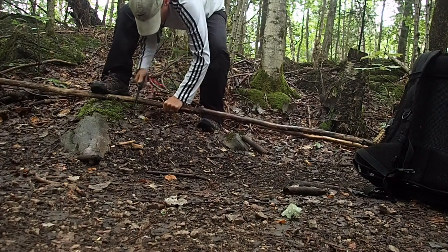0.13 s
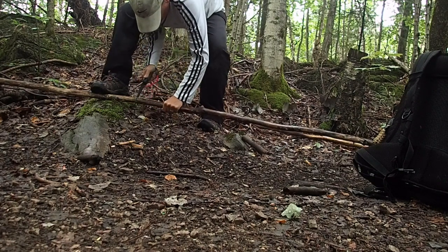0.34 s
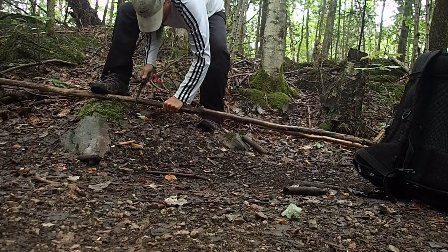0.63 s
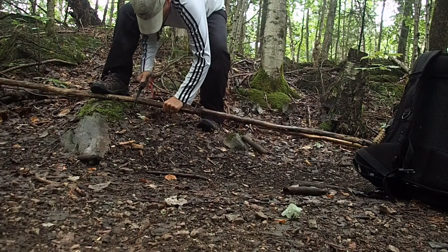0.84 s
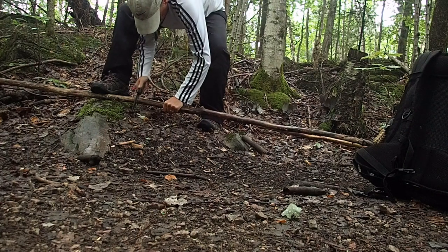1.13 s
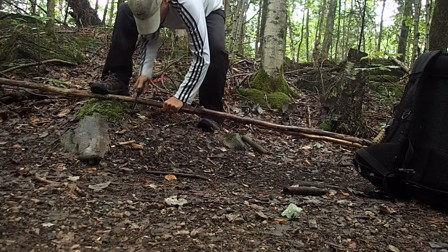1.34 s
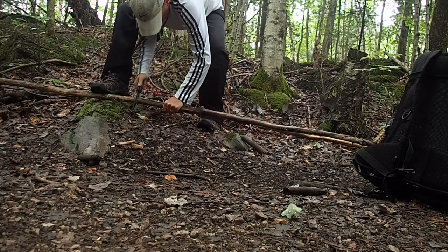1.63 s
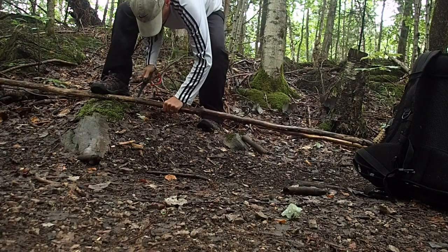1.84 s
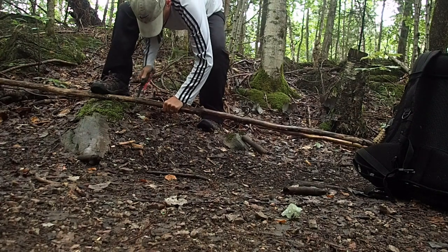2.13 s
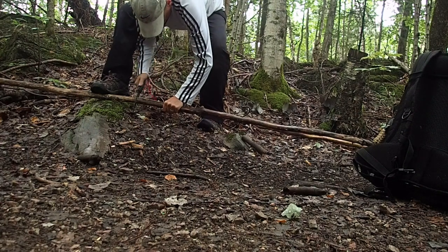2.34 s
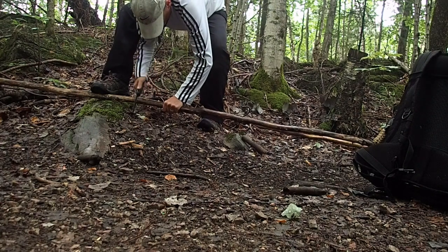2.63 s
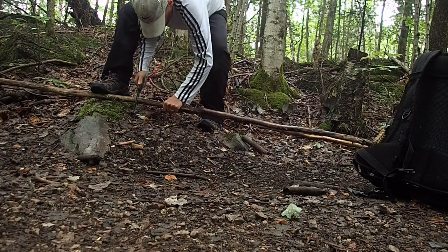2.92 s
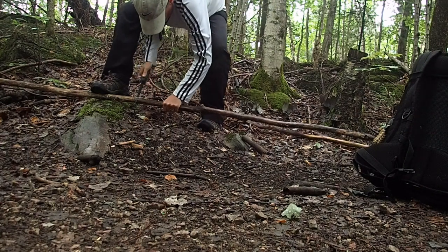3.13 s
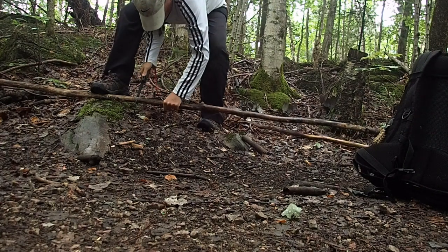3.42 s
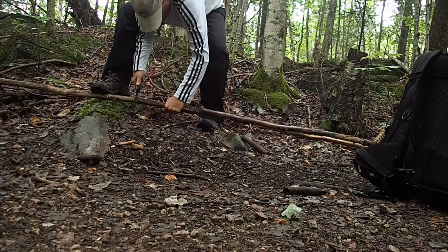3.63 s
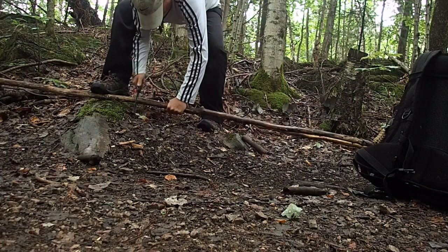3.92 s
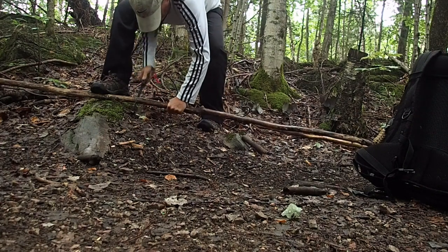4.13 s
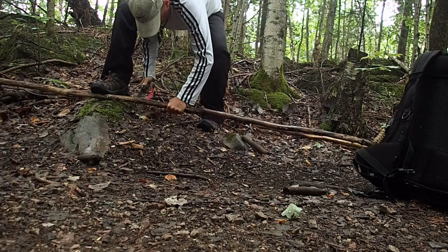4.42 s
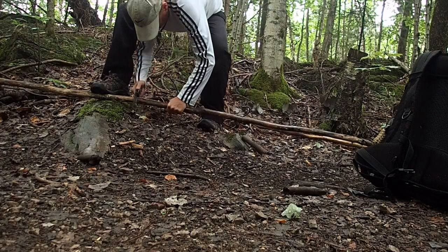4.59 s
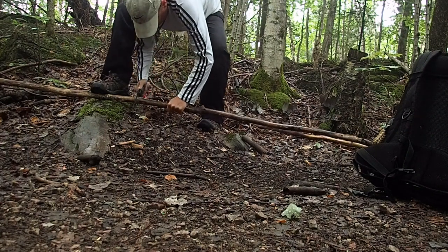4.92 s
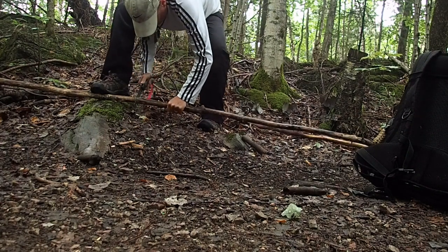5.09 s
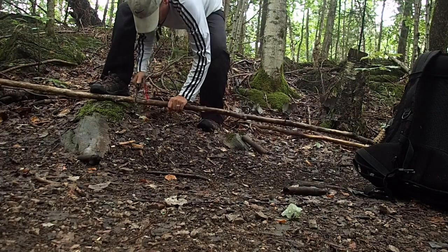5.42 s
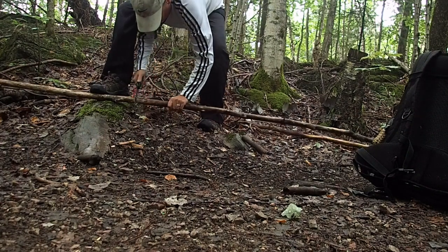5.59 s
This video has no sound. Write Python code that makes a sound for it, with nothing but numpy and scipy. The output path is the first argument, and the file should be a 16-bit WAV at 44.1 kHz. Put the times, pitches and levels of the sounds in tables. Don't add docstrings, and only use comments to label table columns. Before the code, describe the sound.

In a quiet forest, a small hand saw cuts a thin branch in quick short strokes, each a dry toothy rasp with a hollow wooden knock. After a brief pause the strokes resume rougher, with sharp snags and snapping fibres, until the branch parts with a crack. Soft bumps follow. The stereo microphone is a few metres away, the saw slightly to the right, with faint tree echo and leafy hiss.

```python
import sys
import numpy as np
from scipy import signal
from scipy.fft import rfft, irfft, next_fast_len
from scipy.io import wavfile
from scipy.ndimage import uniform_filter1d, map_coordinates

SR = 44100
rng = np.random.default_rng(int(sys.argv[2]) if len(sys.argv) > 2 else 0)


def wav_record(signal):
    frames = np.transpose(np.atleast_2d(signal))
    bounded = np.clip(frames, -1, 1)
    quanta = np.round(bounded * 32767).astype(np.int16)
    wavfile.write(sys.argv[1], SR, quanta)


def nominal_scale(level):
    x = np.asarray(level, float) / 20
    return 10 ** x


N = 253560


def unit(x):
    return x / np.sqrt(np.mean(x ** 2) + 1e-20)


def along(points, hz):
    f, v = np.transpose(points)
    return np.interp(np.log(hz + 1), np.log(f + 1), v)


def wobble(rate):
    return map_coordinates(rng.standard_normal(int(N * rate / SR) + 4), [np.arange(N) * rate / SR])


def filtered(x, response):
    m = next_fast_len(N + SR // 2)
    return irfft(rfft(x, m) * response(np.fft.rfftfreq(m, 1 / SR)), m)[..., :N]


def resonances(modes):
    def shape(f):
        return sum(nominal_scale(db) * 1j * f * width / (centre * centre - f * f + 1j * f * width)
                   for centre, width, db in modes)
    size = np.sqrt(np.mean(abs(shape(np.linspace(0, SR / 2, 2048))) ** 2))
    return lambda f: shape(f) / size


def noise_pair(alike):
    def mix(hz):
        turn = np.arccos(np.clip(along(alike, hz), 0, 1)) / 2
        return np.array([np.cos(turn), np.sin(turn)])
    mid, side = filtered(rng.standard_normal((2, N)), mix)
    return np.array([mid + side, mid - side])


def patchy(x, depth_db):
    z = signal.stft(x, nperseg=128)[2]
    field = uniform_filter1d(rng.standard_normal(z.shape[-2:]), size=4, axis=0)
    field = uniform_filter1d(field, size=5, axis=1)
    return signal.istft(z * nominal_scale(depth_db * unit(field)), nperseg=128)[1][..., :N]


# f/Hz, level/dB per Hz
AIR = [(20, -52), (50, -11.5), (160, -8), (300, -7.5), (480, -13.5), (700, -9.5), (1000, -12),
       (1500, -13.5), (3000, -22.5), (4100, -24), (5200, -13), (8200, -16.5), (10000, -22), (16000, -23)]
# f/Hz, likeness/0-1
AIR_ALIKE = [(60, 0.33), (240, 0.072), (950, 0.26), (3770, 0.52), (15000, 0.037)]
# t/s, level/dB
AIR_DB = [(0, -45.5), (.08, -50.5), (3.199, -50), (3.5, -51), (5.75, -51)]


def air():
    s, db = np.transpose(AIR_DB)
    hiss = unit(filtered(noise_pair(AIR_ALIKE), lambda hz: nominal_scale(along(AIR, hz))))
    level_db = np.interp(np.arange(N) / SR, s, db) + 0.81 * wobble(3.3)
    return hiss * nominal_scale(level_db + np.array([[-1], [2.2]]))


# start t/s, length/s, share before top speed/0-1, rasp
# level/dB, pressure on the wood/dB relative
SAW_STROKES = [(.118, 0.067, 0.28, -42.5, -1), (0.153, 0.11, 0.41, -49, -7), (0.256, .12, 0.61, -39, 3.5),
               (0.387, .14, .62, -34.5, -1), (0.529, .15, 0.68, -37, 2), (0.708, 0.093, 0.64, -37, -2.5),
               (.873, .1, 0.65, -35.5, 0.5), (0.997, .11, 0.69, -36.5, 0.5), (1.07, 0.097, 0.7, -44, 0.5),
               (1.167, 0.066, 0.25, -41, 5), (1.186, .11, 0.675, -40, 3), (1.303, .11, 0.862, -34.5, -1),
               (1.428, .14, 0.76, -35.5, 0), (1.603, .12, 0.52, -36, 0), (1.758, .12, 0.63, -37.5, 2),
               (1.922, .11, .42, -36.5, 0), (2.033, .18, 0.79, -36.5, 1.5), (2.251, 0.097, 0.69, -34.5, -0.5),
               (2.399, .11, .73, -39, 4.5), (2.567, 0.12, 0.49, -35, -2), (2.695, .16, 0.8, -36.5, 0.5),
               (2.91, .11, 0.36, -37.5, -1.5), (3.045, 0.12, 0.72, -38, 0),
               (3.56, .125, 0.553, -36.5, -1), (3.683, .18, 0.59, -34, -3.5), (3.873, 0.11, 0.84, -36, -4),
             (3.986, 0.15, 0.82, -36, 0), (4.148, 0.13, 0.71, -35, -1.5), (4.325, .11, 0.81, -39, 0.5),
             (4.558, 0.071, 0.48, -40, -3.5), (4.611, 0.045, 0.61, -43, 3), (4.715, 0.11, 0.523, -33, -1),
             (4.839, .096, 0.74, -43.5, 1), (4.903, 0.16, 0.061, -50, -25), (5.009, .098, 0.713, -37, 2)]
# t/s, bending over wood level/dB
GIVE = [(.1, -3.5), (.6, -3), (1.0, -1.5), (1.3, -3.5), (2.1, -0.5), (2.35, -1), (2.8, 2), (3.15, -2),
        (3.9, 1), (4.7, 1), (5.1, -2)]


def strokes():
    t, force, speed = np.arange(N) / SR, np.zeros((3, N)), np.zeros(N)
    steepness = np.array([[1.2], [1.6], [2.4]])
    short_bends_db_per_s, usual_stroke_s = -42, 0.089
    for start, length, top, rasp_db, press_db in SAW_STROKES:
        u = np.clip((t - start) / length, 0, 1)
        top = np.clip(top, .05, .95)
        speeding = np.sin(np.pi / 2 * u / top)
        slowing = abs(np.sin(np.pi / 2 * (1 - u) / (1 - top))) ** .67
        arc = np.where(u < top, speeding, slowing)
        give_db = np.interp(start, *np.transpose(GIVE))
        give_db += short_bends_db_per_s * (length - usual_stroke_s)
        levels_db = rasp_db + np.array([0, press_db, press_db + give_db])
        force += nominal_scale(levels_db)[:, None] * arc ** steepness
        speed = np.maximum(speed, arc)
    return force, speed


# f/Hz, likeness/0-1
ALIKE = [(2000, 0.73), (5400, 1), (8000, 0.9), (10000, 0.1), (15000, 0.58)]


def sawing(scatter=.12, size_db=3.0, bite_s=0.0017, steady=1.6, fuzz=0.89, soft_hz=1500, hum=0.04):
    force, speed = strokes()
    turn_hz, fast_hz = 260.9, 317.6
    rate = (turn_hz + (fast_hz - turn_hz) * speed) * (1 + .1 * wobble(12))
    passed = np.cumsum(rate * (1 + .04 * wobble(30))) / SR
    chance = rng.standard_normal((4000, 3))
    tooth = np.arange(1, passed[-1] - 1)
    count = len(tooth)
    at = np.interp(tooth + scatter * chance[:count, 0], passed, np.arange(N)).astype(int)
    bites = np.bincount(at, nominal_scale(size_db * chance[:count, 1]), N)
    rips = np.bincount(at, nominal_scale(size_db * chance[:count, 2]), N)
    tearing = unit(signal.lfilter([1], [1, -np.exp(-1 / (bite_s * SR))], rips))
    rasp = unit((steady + tearing) * patchy(noise_pair(ALIKE), depth_db=2.0))
    rasp = rasp * force[0] * nominal_scale(1.02 * wobble(40))
    push = unit(bites - bites.mean()) + fuzz * rng.standard_normal(N)
    push = filtered(push, lambda hz: 1 / (1 + 1j * hz / soft_hz) ** 2)
    push = push * nominal_scale(0.77 * wobble(35))
    sway = 0.99 * push + hum * np.cos(2 * np.pi * passed)
    return rasp, push * force[1], sway * force[2]


# f/Hz, width/Hz, level/dB
RASP = [(2042, 190, 1), (3190, 500, -4), (3666, 157, -9), (4600, 170, -1), (5180, 300, -4), (5840, 610, 0),
        (6420, 1120, 2.5), (7480, 570, 3.5), (8000, 200, 1), (10500, 350, -45), (12800, 5500, -14.5),
        (15700, 3200, -14)]
# f/Hz, width/Hz, level/dB
WOOD = [(586.6, 56, 1), (713, 125, 8), (799, 45, 1.5), (915, 180, 7), (1117, 90, -4), (1240, 53, -5.5),
        (1616, 53, 7)]
# f/Hz, width/Hz, level/dB
BENDING = [(263.7, 63, 10), (361.3, 77, 7)]


def branch():
    rasp, push, bend = sawing()
    snag, snag_knock = snagging()
    snap, snap_knock = snapping()
    fibres = filtered(nominal_scale(-0.5) * rasp, resonances(RASP)) + snag + snap
    knocks = nominal_scale(1.0) * patchy(push, depth_db=1.5) + snag_knock + snap_knock
    wood = filtered(knocks, resonances(WOOD))
    low = filtered(bend + landing(), resonances(BENDING)) + shudders()
    return lean(fibres + wood + ticks() + bumps()) + low * nominal_scale(np.array([[-16], [1.5]]))


# f/Hz, left minus right level/dB
LEFT = [(300, 4), (700, -3.5), (2400, -3), (5500, -5.5), (8500, -5.5), (11000, -2.5), (15000, 0)]


def lean(x):
    early_s = 6e-6 * np.array([[-1], [1]])
    return filtered(x, lambda hz: nominal_scale(along(LEFT, hz) * [[.5], [-.5]]) * np.exp(2j * np.pi * hz * early_s))


# f/Hz, t60/s
TRUNKS = [(300, 0.28), (1500, 0.21), (3000, 0.69), (5500, 0.7), (8500, 0.33), (13000, 0.32)]


def trunks(x, gap_s=.005, count=8):
    out, step, gap = np.zeros((2, N + SR)), N // count + 1, round(gap_s * SR)
    for start in range(0, N, step):
        hz, t, z = signal.stft(rng.standard_normal((2, SR * 3 // 4)), SR, nperseg=256)
        decay = nominal_scale(-60 * t / along(TRUNKS, hz)[:, None])
        build = 1 - 0.4 * np.exp(-t / 0.0074)
        tail = signal.istft(z * decay * build, SR, nperseg=256)[1]
        tail[1] = .5 * tail[0] + 0.75 * tail[1]
        echo = signal.fftconvolve(x[:, start:start + step], tail / np.linalg.norm(tail[0]), axes=1)
        out[:, start + gap:][:, :echo.shape[1]] += echo
    return out[:, :N]


def tears(events, rasp_db, knock_db, rise_s, alike):
    size, knock, t = np.zeros(N + SR), np.zeros(N + SR), np.arange(SR // 10) / SR
    for s, db, wood_db, t60 in events:
        burst = nominal_scale(db - 60 * t / max(t60, .002)) * (1 - np.exp(-t / rise_s))
        size[round(s * SR):][:len(t)] += burst
        knock[round(s * SR):][:len(t)] += nominal_scale(wood_db) * burst
    torn = nominal_scale(rasp_db) * size[:N] * noise_pair(alike)
    return torn, nominal_scale(knock_db) * knock[:N] * rng.standard_normal(N)


# t/s, peak level/dB
CATCHES = [(0.133, -27.5), (0.1828, -28.5), (1.0295, -30), (1.6232, -34), (1.6866, -23), (1.937, -28),
           (2.0685, -36), (2.0868, -26), (2.1445, -32), (2.582, -35), (2.7262, -41), (2.7354, -27.5),
           (3.064, -35), (3.285, -47), (3.505, -52), (3.5635, -35), (3.64, -25), (3.648, -23),
           (3.9385, -23), (4.2963, -29), (4.569, -42), (4.59, -26), (4.633, -25), (4.9576, -29),
           (5.171, -35), (5.176, -40)]
# t/s, peak level/dB, wood knock/dB relative
SNAGS = [(0.32, -22, -13), (0.574, -19, -12), (0.9154, -27, -11), (1.117, -26.5, 3), (1.127, -31.5, 11),
         (1.1765, -20.5, -3), (1.186, -18, -20), (1.1933, -16, -32), (1.2082, -21, -19), (1.2373, -25, 4),
         (1.3973, -16, -26), (1.9528, -23.5, -6), (0.557, -37, 12), (3.5995, -41.5, 23.5),
         (3.631, -12.5, -16), (3.6945, -24, -5.5), (3.732, -15.5, -14), (3.7513, -12, -22),
         (3.7672, -13.5, -24), (3.7786, -21, -24), (3.9505, -24.5, -3), (4.2639, -16, -11),
         (4.6277, -19, -4), (4.6394, -16.5, -2.5), (4.7121, -35.5, 8.5), (4.7345, -26.5, -4),
         (4.7602, -12, -18), (4.7676, -16, -8), (4.784, -19, -3), (4.79, -14, -18)]
# t/s, peak level/dB, knock/dB relative, t60/s
SLAP = (5.22, -32, -5, 0.2)
# f/Hz, width/Hz, level/dB
BLADE = [(3460, 1800, -5.5), (4700, 770, -7), (6270, 1150, 5.5), (7770, 1100, 5), (13000, 6500, -17)]


def snagging():
    snag_t60_s, catch_t60_s, catch_knock_db = 0.018, 0.021, -17.5
    caught = [(*row, snag_t60_s) for row in SNAGS]
    caught += [(*row, catch_knock_db, catch_t60_s) for row in CATCHES]
    caught += [SLAP]
    snag, knock = tears(caught, rasp_db=-4, knock_db=-6.5, rise_s=0.00051, alike=ALIKE)
    blade = resonances(BLADE)
    return nominal_scale(-5.5) * filtered(filtered(snag, blade), blade), knock


# t/s, peak level/dB
TICKS = [(.218, -43), (.234, -39), (2.398, -47)]
# f/Hz, level/dB, t60/s
STEEL = [(4530, 2.5, 0.02), (9000, -8, .03), (11200, -2, 0.043), (15000, -8, .05)]


def ticks():
    out, t = np.zeros(N + SR), np.arange(SR // 5) / SR
    for s, db in TICKS:
        for hz, level, t60 in STEEL:
            out[round(s * SR):][:len(t)] += nominal_scale(db + level - 60 * t / t60) * np.sin(2 * np.pi * hz * t)
    return out[:N]


# t/s, peak level/dB, wood knock/dB relative, tearing t60/s
SNAPS = [(.850, -32, -30, .009), (3.9928, -24.5, -14, 0.0078), (4.2644, -36, -26, 0.0075),
         (4.5009, -30, -24, 0.014), (4.5151, -23.5, -15, 0.0092), (4.927, -10, -18, 0.0081),
         (5.7414, -36, -4, 0.0086)]
# f/Hz, width/Hz, level/dB
DRY = [(1220, 860, -13), (2110, 270, -10), (3100, 300, -8.5), (4460, 430, -4), (5130, 320, 5),
       (5900, 240, -10), (7063, 430, -5), (8020, 560, 4), (10174, 800, -23), (12410, 1100, -20),
       (15110, 1500, -18.5)]


def snapping():
    alike = [(5000, 0.87), (14000, 0.47)]
    snap, knock = tears(SNAPS, rasp_db=-1.0, knock_db=3.0, rise_s=0.00022, alike=alike)
    return filtered(snap, resonances(DRY)), knock


# start t/s, length/s, f/Hz, level/dB
SHUDDERS = [(2.284, .08, 249.9, -33), (2.441, 0.072, 285.5, -32), (2.604, .045, 250.3, -29.5),
            (2.626, 0.05, 343, -26), (2.775, .07, 300, -30)]


def shudders():
    t, out = np.arange(N) / SR, np.zeros(N)
    for s, length, hz, db in SHUDDERS:
        swell = np.sin(np.pi * np.clip((t - s) / length, 0, 1)) ** 2
        out += nominal_scale(db) * swell * np.sin(2 * np.pi * hz * t)
    return out


# t/s, peak level/dB, f/Hz, t60/s, rise/s
BUMPS = [(3.636, -23, 1283, 0.038, .001), (3.951, -26, 1257, 0.054, .001),
         (4.264, -25, 1256, 0.024, 0.00085), (5.660, -27, 419, 0.05, 0.0077),
         (5.727, -28, 1110, 0.021, 0.0007), (5.73, -32, 334, 0.04, 0.0054)]


def bumps():
    out, t = np.zeros(N + SR), np.arange(SR // 5) / SR
    for s, db, hz, t60, rise in BUMPS:
        sag = 2 * np.pi * hz * t * (1 - 4 * t)
        tone = np.sin(sag) + 0.18 * np.sin(2.7 * sag) * np.cos(0.38 * sag)
        out[round(s * SR):][:len(t)] += nominal_scale(db - 60 * t / t60) * (1 - np.exp(-(t / rise) ** 2)) * tone
    return out[:N]


# t/s, peak level/dB
BREAK = [(5.1904, -17), (5.1909, -12), (5.1916, -15), (5.1925, -16), (5.1936, -19)]
# f/Hz, width/Hz, level/dB
STUMP = [(926, 106, -13), (1320, 460, -6.5), (2197, 236, -7.5), (3020, 200, -4.5), (3700, 304, -13),
         (4504, 400, -11), (5126, 300, 1), (6050, 540, 0.5), (7040, 310, -8), (7893, 440, 3),
         (10910, 770, -24), (12240, 640, -10), (14600, 1530, -19)]


def parting():
    blows = np.zeros((2, N))
    for s, db in BREAK:
        blows[0, round(s * SR)] = nominal_scale(db + 18.0) * rng.choice([-1, 1])
    blows[1, round(BREAK[0][0] * SR)] = nominal_scale(4.5) * np.linalg.norm(blows[0])
    stump = resonances(STUMP)
    return filtered(blows, lambda f: stump(f) * 1j * f / (600 + 1j * f))


# t/s, level/dB, t60/s
LANDING = (5.224, -36.5, 0.2)


def landing():
    s, db, t60 = LANDING
    t = np.maximum(np.arange(N) / SR - s, 0)
    return nominal_scale(db - 60 * t / t60) * (1 - np.exp(-t / 0.0031)) * rng.standard_normal(N)


def scene():
    near = branch()
    crack, merged = parting()
    return near + lean(crack) + nominal_scale(-11.5) * trunks(near + lean(merged)) + air()


def low_pass(x):
    return signal.sosfilt(signal.butter(12, 17070, fs=SR, output="sos"), x)


# f/Hz, width/Hz, depth/dB
SHELL_DIPS = [(1886, 395, 17), (2546, 100, 25), (3315, 84, 14.5), (4035, 125, 15), (4830, 46, 32)]


def record(dry):
    top_hz, bass_hz, ceiling = 15800, 55, .86

    def dip(f, centre, width, db):
        stiff = centre * centre - f * f
        return (stiff + 1j * f * width * nominal_scale(-db)) / (stiff + 1j * f * width)

    def shell(f):
        dips = np.prod([dip(f, *row) for row in SHELL_DIPS], axis=0)
        return dips * (f < top_hz) * (1j * f / (bass_hz + 1j * f))

    heard = filtered(dry, shell)
    rounded = heard / (1 + abs(heard / ceiling) ** 4) ** 0.2
    return low_pass(rounded)


dry = scene()
out = record(dry)
wav_record(out)
```